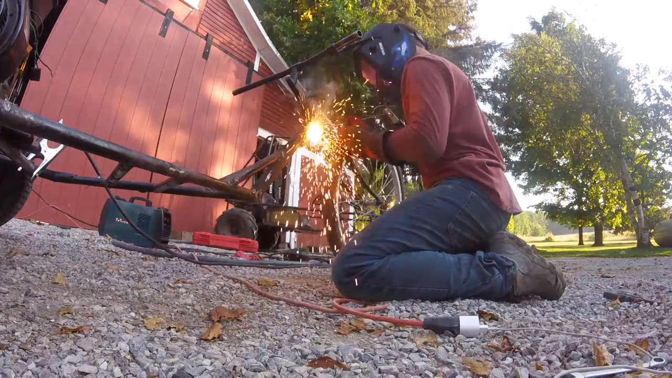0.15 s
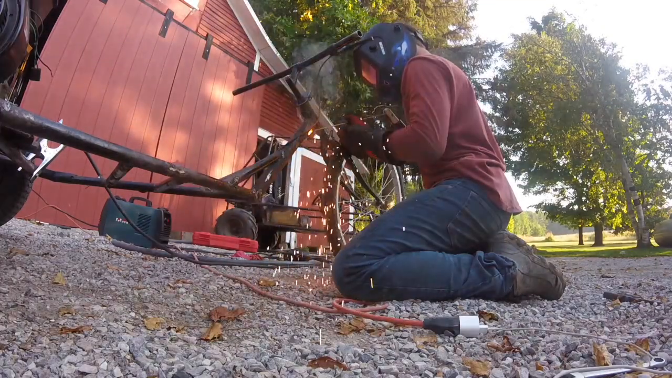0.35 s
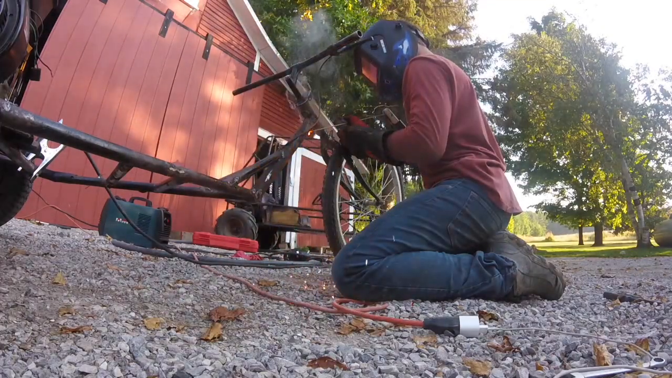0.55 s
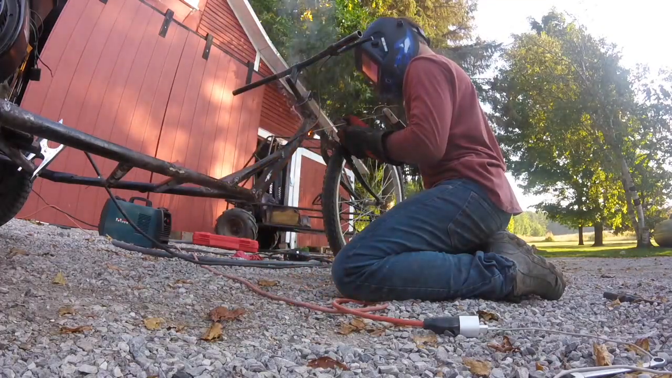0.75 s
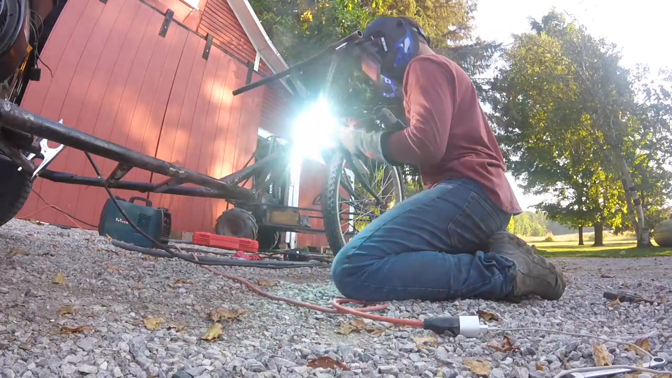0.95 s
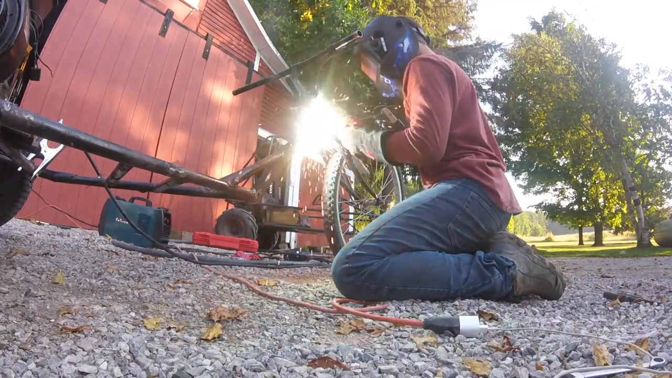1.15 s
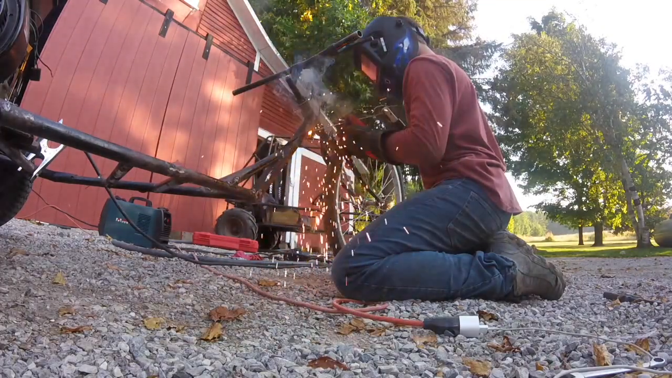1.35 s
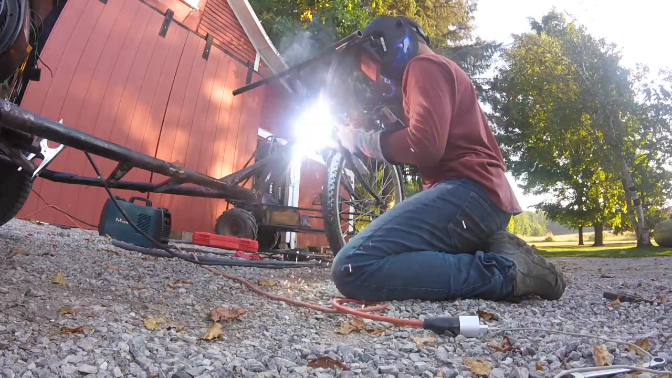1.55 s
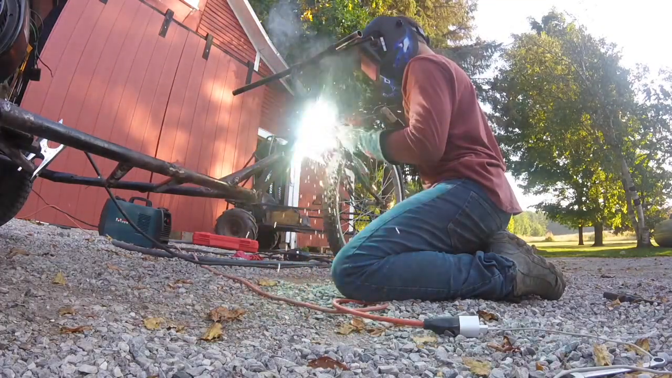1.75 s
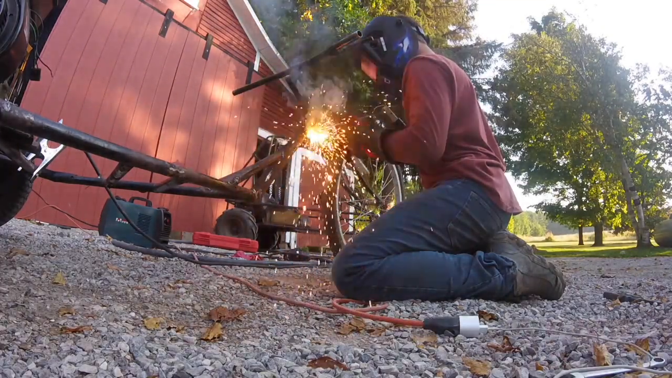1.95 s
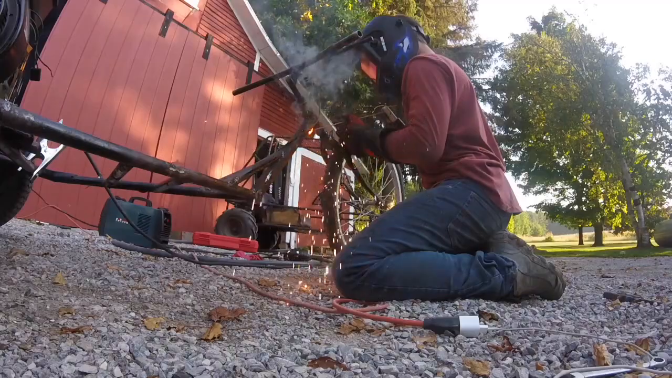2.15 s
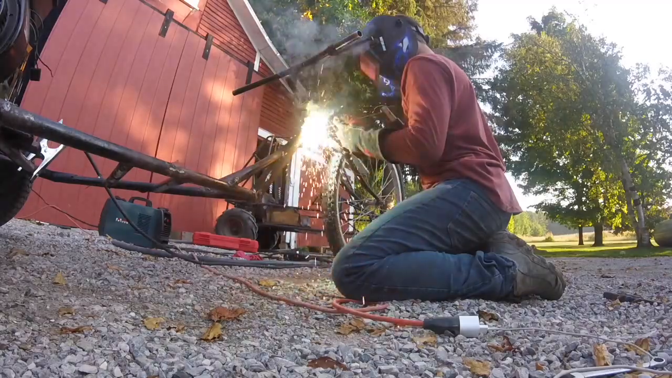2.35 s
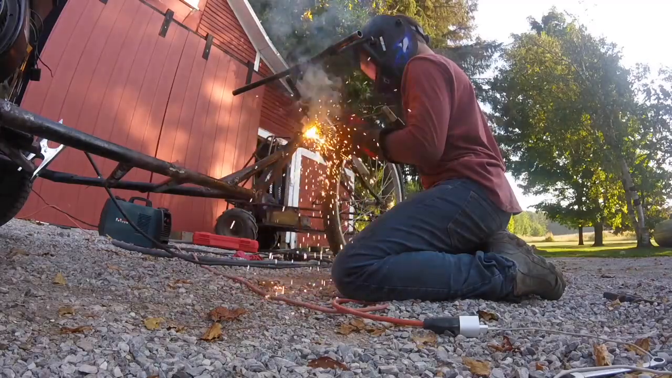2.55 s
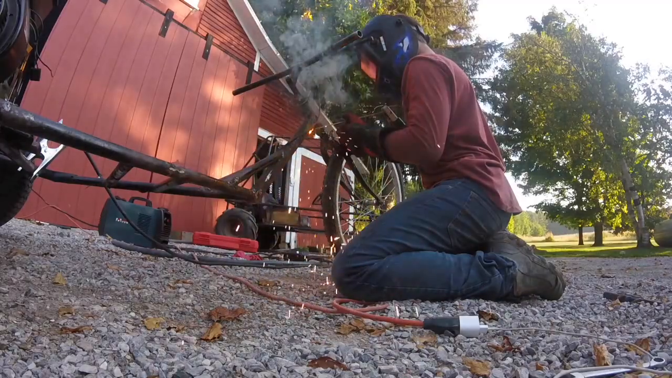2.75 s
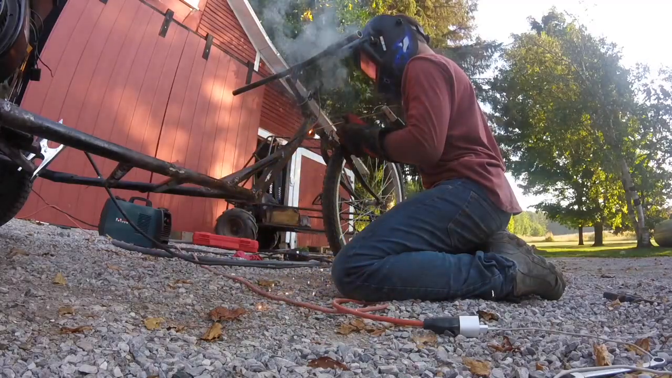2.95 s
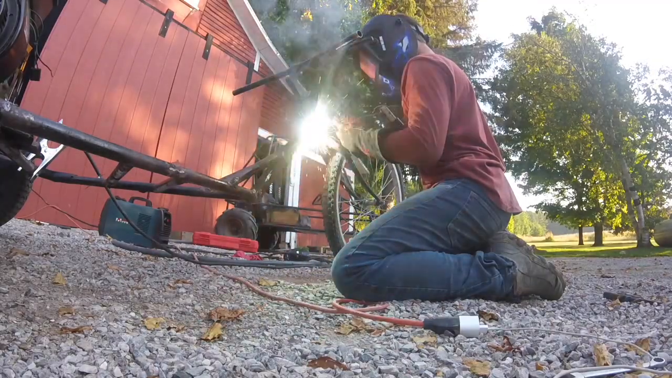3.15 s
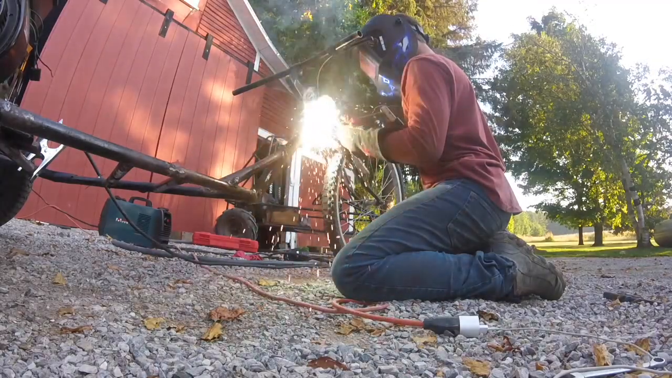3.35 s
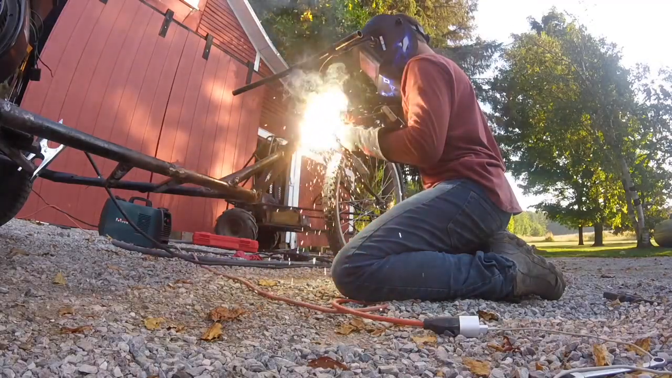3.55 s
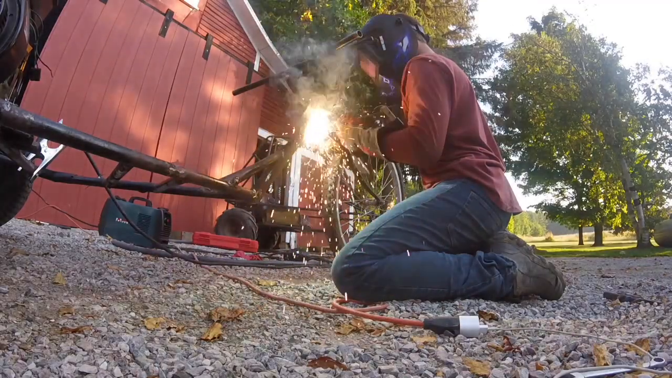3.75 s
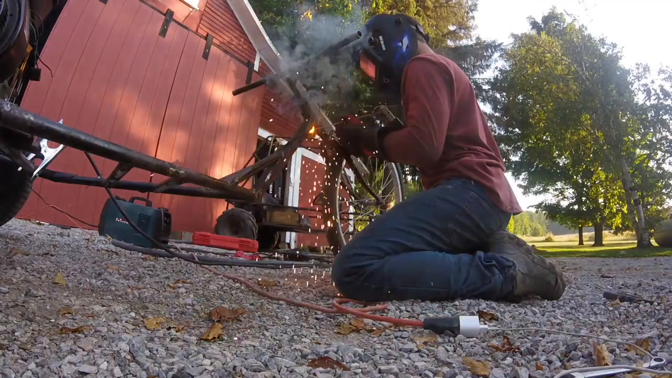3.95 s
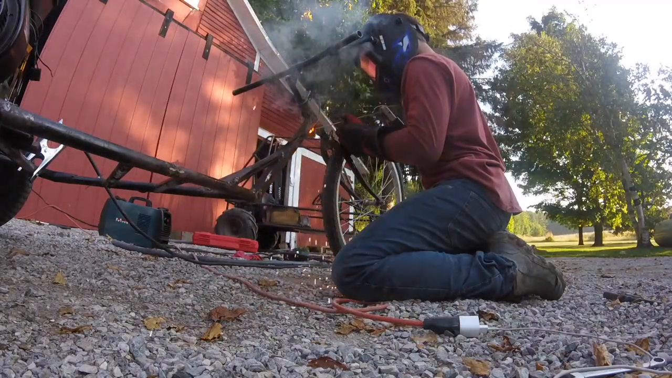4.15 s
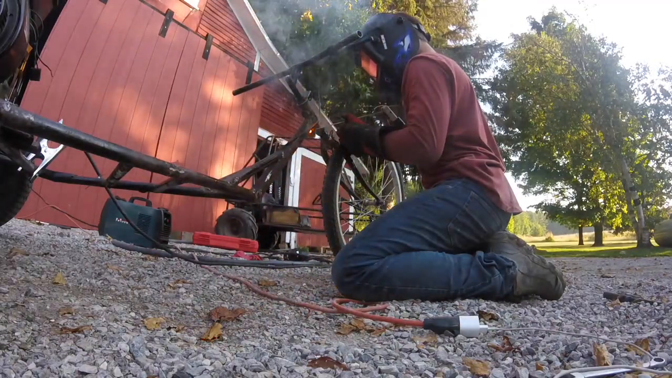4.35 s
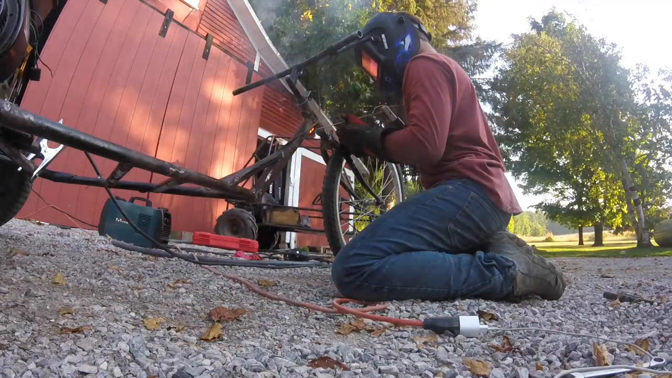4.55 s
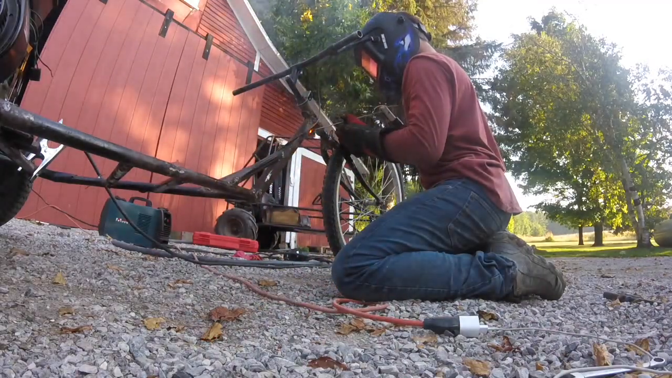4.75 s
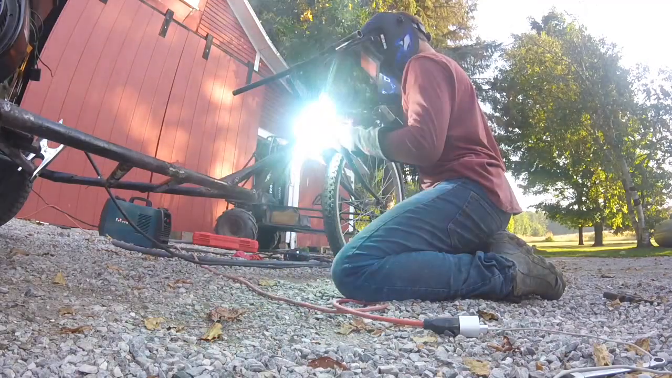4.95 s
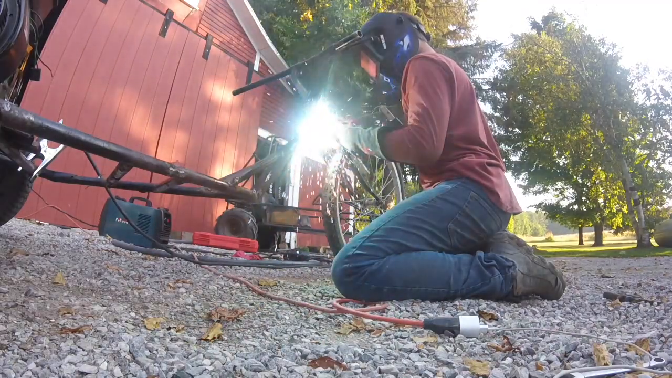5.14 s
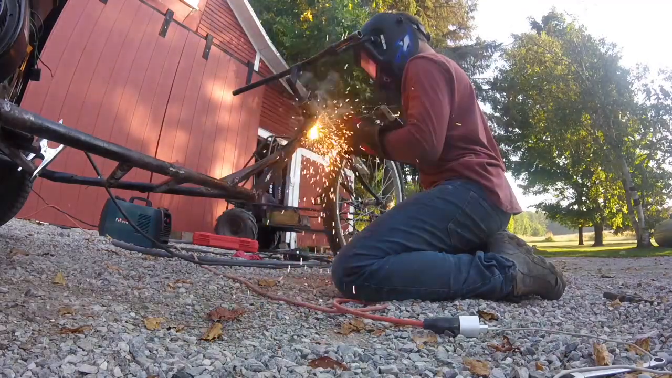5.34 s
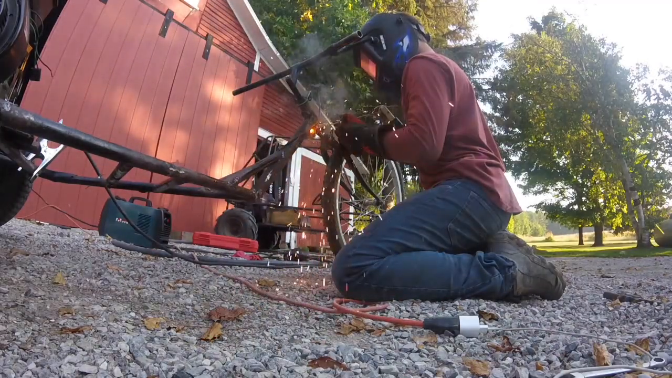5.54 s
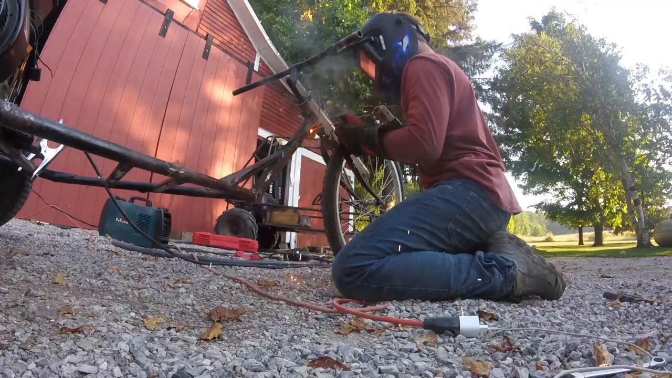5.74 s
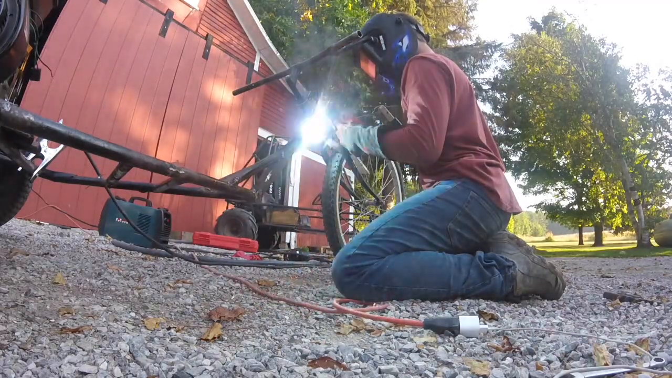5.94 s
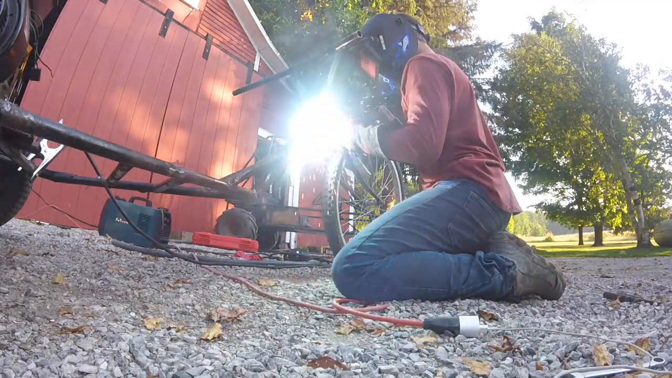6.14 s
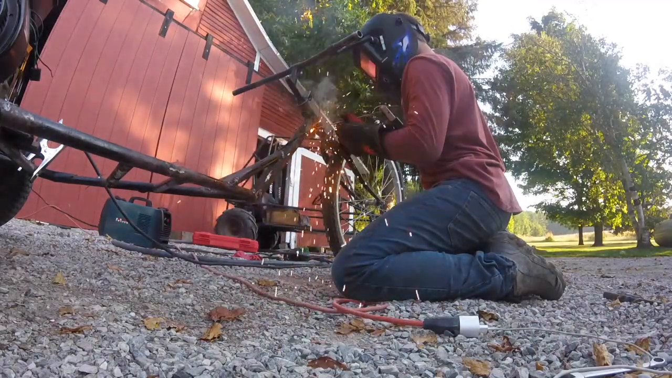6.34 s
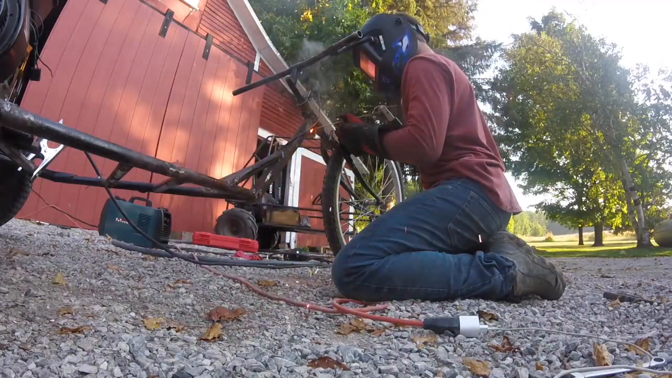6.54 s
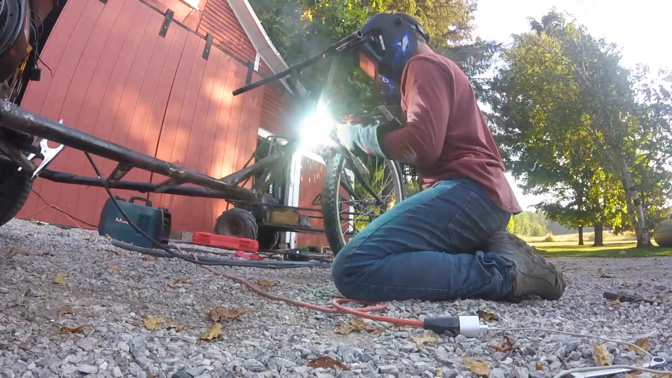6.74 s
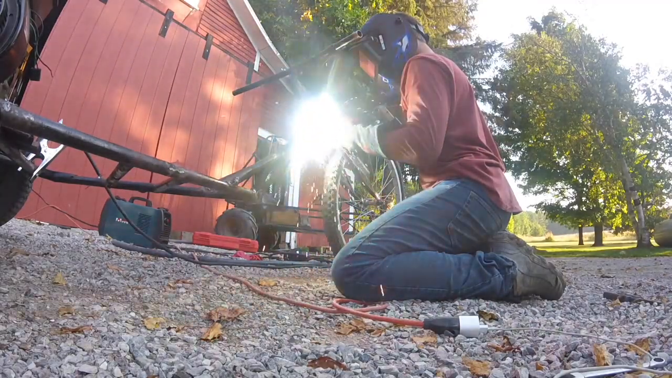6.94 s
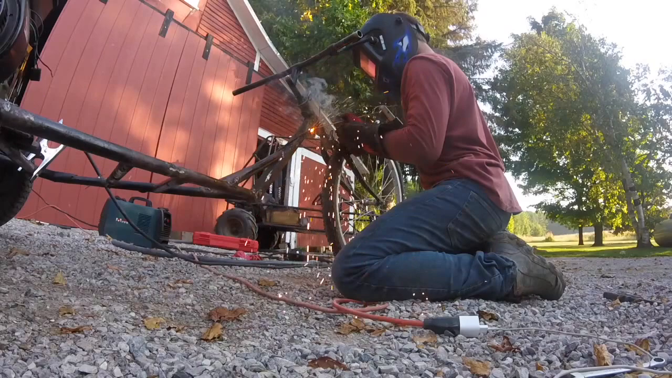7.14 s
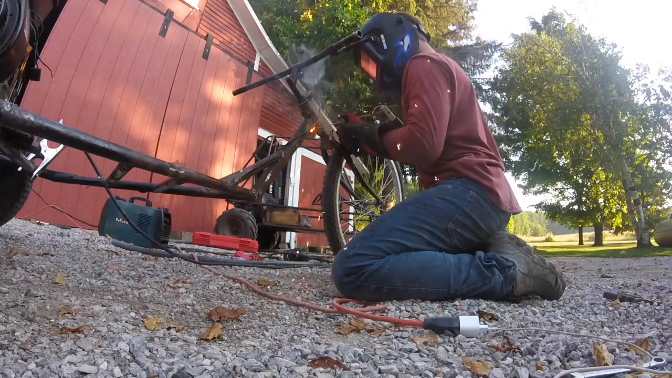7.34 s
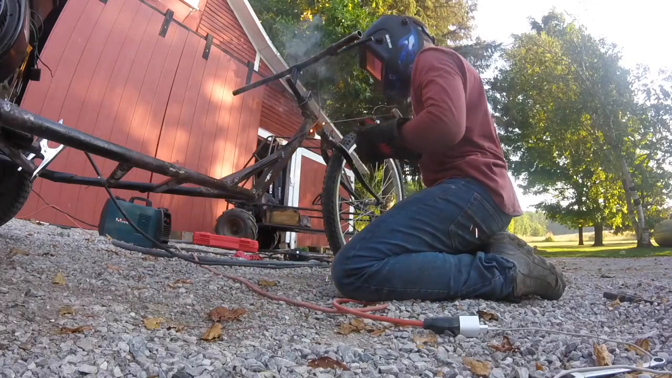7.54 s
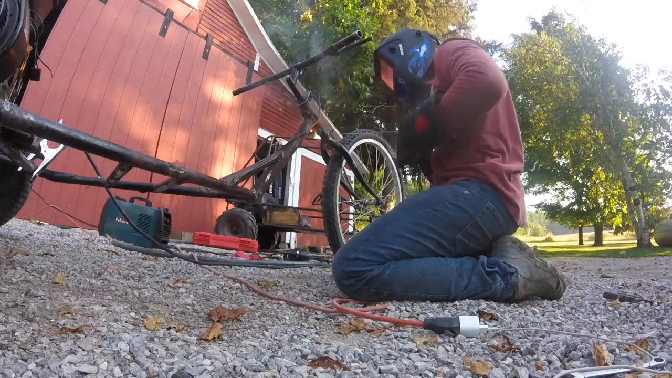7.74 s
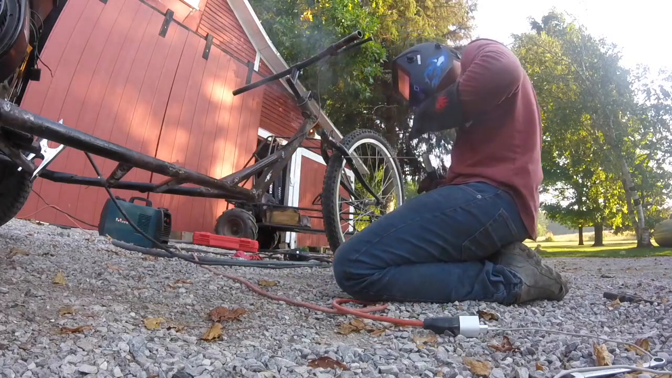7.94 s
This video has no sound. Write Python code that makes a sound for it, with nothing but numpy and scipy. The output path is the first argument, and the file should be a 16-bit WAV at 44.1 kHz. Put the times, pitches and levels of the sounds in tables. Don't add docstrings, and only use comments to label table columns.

```python
import sys
import numpy as np
from scipy import signal
from scipy.fft import rfft, irfft
from scipy.io import wavfile
from scipy.ndimage import uniform_filter1d

SR = 44100
rng = np.random.default_rng(int(sys.argv[2]) if len(sys.argv) > 2 else 0)


def dump(signal):
    limited = np.clip(np.atleast_2d(signal).T, -1, 1)
    pcm = np.round(limited * 32767).astype(np.int16)
    wavfile.write(sys.argv[1], SR, pcm)


def how_loud(loudness_db):
    steps = np.asarray(loudness_db, float) / 20
    return 10 ** steps


N = 352359
GRID_HZ = np.arange(4097) * SR / 8192 + 1


def impulse(power):
    ceps = irfft(np.log(power) / 2)
    half = len(ceps) // 2
    ceps[1:half] *= 2
    ceps[half + 1:] = 0
    return irfft(np.exp(rfft(ceps)))[:2048]


def shaped(points):
    hz, db = np.transpose(points)
    return impulse(how_loud(2 * np.interp(np.log(GRID_HZ), np.log(hz), db)))


def resonant(modes, valley_db, notches=()):
    power = how_loud(2 * valley_db)
    for hz, width, db in modes:
        power = power + how_loud(2 * db) / (1 + ((GRID_HZ - hz) / width) ** 2) ** 2
    for hz, width, db in notches:
        power = power * how_loud(2 * db / (1 + ((GRID_HZ - hz) / width) ** 2))
    return impulse(power)


def through(x, response):
    return signal.fftconvolve(x, response)[:N]


def peak_one(response):
    return response / abs(response).max()


def unit(x):
    return x / np.sqrt(np.mean(x ** 2))


def noise():
    return rng.standard_normal(N)


def walk(rate):
    hold = int(SR / rate)
    levels = np.repeat(rng.standard_normal(N // hold + 1), hold)
    return 1.123 * uniform_filter1d(levels, hold)[:N]


def grains(rate, spread_db):
    where, size, sign = rng.random(N), rng.exponential(size=N), rng.standard_normal(N)
    return (where < rate / SR) * sign * how_loud(spread_db * size)


# strike t/s, break t/s, tube ring level/dB, hum level/dB, frame ring level/dB
STITCH_TIMES = [
    (-0.1, 0.242, 1.5, 3, -3.5),
    (0.993, 1.296, 7, 1.5, 2),
    (1.647, 2.03, -11, 2, 0),
    (2.296, 2.622, -11, -8, 0),
    (3.184, 3.904, -12, 3, -1),
    (5.001, 5.403, 7, 1, -1),
    (6.038, 6.281, 13, 4.5, -0.5),
    (6.767, 7.057, 13, -7.5, -1),
]
# t/s, current as sputter level/dB, arc length as sizzle level/dB
ARC_CURVES = [
    [(0.0, -30.5, -40.5), (0.044, -40.5, -42.5), (0.182, -41, -40.5), (0.224, -40.5, -44.5),
     (0.24, -34, -40)],
    [(1.03, -45, -41), (1.112, -47, -43), (1.252, -45.5, -38.5), (1.276, -44, -42), (1.29, -45, -39.5)],
    [(1.68, -43.5, -43.5), (1.694, -46.5, -42.5), (1.848, -46, -41.5), (1.87, -44.5, -38),
     (2.025, -38, -41.5)],
    [(2.32, -51.5, -40.5), (2.372, -38, -42), (2.494, -44.5, -40), (2.558, -38.5, -41), (2.62, -39, -42.5)],
    [(3.21, -49.5, -43), (3.322, -48.5, -41.5), (3.47, -37, -42.5), (3.756, -36, -42.5), (3.9, -39.5, -43)],
    [(5.03, -58, -41), (5.078, -40.5, -45.5), (5.346, -37, -43), (5.358, -34.5, -45.5), (5.4, -39, -43.5)],
    [(6.06, -41.5, -45), (6.144, -38, -46.5), (6.156, -40, -43), (6.264, -37, -44.5), (6.28, -38, -42)],
    [(6.79, -39.5, -45.5), (6.81, -42.5, -47), (6.896, -38.5, -45), (6.914, -38.5, -45),
     (7.05, -35.5, -44.5)],
]


def arc_control(law, column=None):
    usual_db, flare_s, break_s = -42, 0.032, 0.0018
    level_db, by_current, by_length, flare_db = law
    t, gain = np.arange(N) / SR, np.zeros(N)
    for stitch, state in zip(STITCH_TIMES, ARC_CURVES):
        strike, stop = stitch[:2]
        s, current, length = np.transpose(state)
        drive_db = by_current * (current - usual_db) + by_length * (length - usual_db)
        db = level_db + np.interp(t, s, drive_db)
        db += flare_db * np.exp(-abs(t - strike) / flare_s)
        if column:
            db += stitch[column]
        gain += how_loud(db) * (t >= strike) * np.exp(-np.maximum(t - stop, 0) / break_s)
    return uniform_filter1d(gain, size=60)


# f/Hz, width/Hz, level/dB
BRIGHT_MODES = [(1814, 49, -16), (2340, 83, -3), (3050, 590, -1), (3865, 184, 2.5), (5360, 1130, -3),
                (7430, 570, 0), (9000, 500, -8), (10800, 620, -14), (10100, 260, -13), (12840, 320, -10.5),
                (15100, 1000, -25)]
# f/Hz, width/Hz, level/dB
ECHO_NOTCHES = [(1880, 100, -7), (2580, 67, -9.5), (4490, 84, -6), (6110, 180, -8.5), (9300, 190, -41)]
# f/Hz, level/dB per Hz
CASE_COLOUR = [(40, -40.5), (70, -19), (120, -7), (240, -4), (330, -7), (660, -5), (850, 2.5), (1030, -4),
               (1200, -9), (1330, -32.5), (1700, -30.5), (2200, -68.5), (3700, -46.5)]
# f/Hz, width/Hz, level/dB
FRAME_MODES = [(1683, 65, -7), (2243, 93, 4), (2880, 240, 2.5)]
# level/dB, share of current, share of arc length, strike flare/dB
SIZZLE_LAW = (-40.5, 0.27, 1.45, 1)
SPUTTER_LAW = (-40, 1.13, 0.6, 7.5)
TUBE_LAW = (-42.5, 0.14, 1.5, -4)
FRAME_LAW = (-45, 1.56, 0.1, 4)
HUM_LAW = (-43.5, 1.5, 1.1, 12)


def arc(bright, case):
    ripple_hz = 119.8
    phase = ripple_hz * np.arange(N) / SR + 0.31
    swell = np.exp(np.cos(2 * np.pi * (phase + 0.055 * walk(60))))
    sparks = unit(grains(20000, 2.5)) * swell ** 0.17 * how_loud(1.66 * walk(90) + 0.25 * walk(25))
    kicks = unit(grains(5000, 2.0)) * swell ** 0.3 * how_loud(1.35 * walk(ripple_hz))

    sizzle = unit(through(sparks, bright)) * arc_control(SIZZLE_LAW) * how_loud(-1.0)
    sputter = unit(through(kicks, case)) * arc_control(SPUTTER_LAW) * how_loud(4.0)
    tube_air = resonant([(803, 38, 0)], valley_db=-39.5)
    tube = unit(through(kicks, tube_air)) * arc_control(TUBE_LAW, column=2) * how_loud(-2.5)
    steel = resonant(FRAME_MODES, valley_db=-76.0)
    frame = unit(through(kicks + sparks, steel)) * arc_control(FRAME_LAW, column=4) * how_loud(-6.5)
    second = 1.18 * how_loud(2.1 * walk(12.16)) * np.cos(4 * np.pi * phase + 1.38)
    hum = (np.cos(2 * np.pi * phase) + second) * arc_control(HUM_LAW, column=3) * how_loud(-9.5)
    return sizzle + sputter + tube + frame + hum


# f/Hz, level/dB per Hz
FAN_AIR = [(12, -57), (20, -2.5), (65, -6), (146, -16.5), (186, -10), (246, -12.5), (285, -2), (344, -11.5),
           (363, -9), (406, -7.5), (438, -6), (471, -13.5), (557, -5.5), (887, -5.5), (1700, -35.5),
           (2210, -52), (3740, -120)]
# f/Hz, level/dB
BLADE_TONES = [(290.7, -61), (436.0, -56.5), (667.5, -59.5), (877.5, -56.5)]
# f/Hz, width/Hz, level/dB
HOUSING_MODES = [(1052, 106, 2), (1299, 24, -3.5)]


def fan():
    fan_db = -44.5
    air = unit(through(noise(), shaped(FAN_AIR))) * how_loud(fan_db + 0.5 * walk(3))
    draught = unit(through(noise(), resonant(HOUSING_MODES, valley_db=-80))) * how_loud(fan_db - 10)
    sway = np.cumsum(1 + 0.0015 * walk(5)) / SR
    out = air + draught
    for hz, db in BLADE_TONES:
        out += how_loud(db + 4.0 + 1.0 * walk(14)) * np.sin(2 * np.pi * hz * sway)
    return out


# f/Hz, level/dB per Hz
LEAF_HISS = [(880, -30.5), (1500, -5), (2420, -10.5), (6570, -16.5), (8690, -21), (10300, -29),
             (12600, -31), (13800, -52)]


def trees():
    return unit(through(noise(), shaped(LEAF_HISS))) * how_loud(-66 + 0.8 * walk(1.5))


# t/s, click rate f/Hz, level/dB
CICADA_SONG = [(0, 201.4, -84), (1.5, 201, -78), (2.15, 200.5, -73.5), (2.7, 200.3, -64.5),
               (3.15, 200.2, -75.5), (4, 199.4, -80), (4.5, 199.2, -75), (4.95, 199.2, -70.5),
               (5.5, 198.6, -70), (6, 198, -74), (6.699, 196, -75.5), (7.3, 194.2, -69.5), (7.6, 193, -76),
               (7.99, 190, -81)]
# f/Hz, width/Hz, level/dB
CICADA_BODY = [(5790, 95, 0), (6400, 120, -16), (6800, 150, -24), (7480, 150, -15), (8750, 120, -19)]
# t/s, click rate f/Hz, level/dB
NEIGHBOUR_SONG = [
    (0, 206, -80),
    (.7, 205, -90),
    (1.5, 204, -85),
    (5.5, 200, -92),
    (6.5, 198, -75),
    (7.15, 193.3, -64),
    (7.5, 192, -71),
    (7.99, 185, -72),
]
# f/Hz, width/Hz, level/dB
NEIGHBOUR_BODY = [(5800, 330, 0), (6700, 350, -7), (7450, 250, -8), (8650, 250, -13)]


def cicada(song, body, waver):
    s, rate, level_db = np.transpose(song)
    t = np.arange(N) / SR
    clicks = np.cumsum(np.interp(t, s, rate) * (1 + waver * walk(4.8))) / SR
    tones = np.zeros(N)
    for harmonic in range(26, 46):
        tones += how_loud(1.5 * walk(3)) * np.sin(2 * np.pi * (harmonic * clicks + rng.random()))
    return unit(through(tones, resonant(body, valley_db=-40))) * how_loud(np.interp(t, s, level_db))


# t/s, peak level/dB, f/Hz, ring/s
PLASMA_POPS = [(0.235, -20, 930, 0.016), (0.996, -20, 814, 0.033), (1.006, -10.5, 834, 0.017),
               (3.455, -25, 850, 0.014), (3.503, -21, 840, 0.015), (3.564, -22, 900, 0.0099),
               (3.696, -16, 860, 0.014), (3.747, -21, 840, 0.015), (3.789, -14, 840, 0.018),
               (3.821, -24, 850, 0.017), (3.881, -23, 965, 0.036), (6.039, -17, 774, 0.018),
               (6.165, -23, 810, 0.023), (6.2, -18.5, 800, 0.036), (6.26, -18, 820, 0.028),
               (6.938, -21, 790, 0.04), (7.025, -16.5, 810, 0.02)]


def pops():
    out, t = np.zeros(N + 4096), np.arange(4096) / SR
    for s, db, hz, ring in PLASMA_POPS:
        shape = (1 - np.exp(-t / 0.0021)) * np.exp(-np.log(1000) * t / max(ring, 0.005))
        i = int(s * SR)
        out[i:i + 4096] += how_loud(db - 4.5) * shape / shape.max() * np.sin(2 * np.pi * hz * t)
    return out[:N]


# t/s, peak level/dB, low part over it level/dB, ring/s
ARC_SNAPS = [(0.9935, -15, 0, 0.014), (1.2063, -28, 6, 0.01), (1.229, -24, 1, 0.011),
             (1.2911, -28.5, 10.5, 0.015), (1.648, -15.5, -8, 0.016), (2.297, -16.5, -3, 0.012),
             (2.616, -22.5, 3.5, 0.0068), (3.1835, -11, -4, 0.0049), (3.256, -20, -5, 0.015),
             (3.4218, -20, -16, 0.0096), (3.5973, -26, -8, 0.012), (3.6863, -23, -15, 0.022),
             (3.7981, -22, -4, 0.0074), (3.8801, -22.5, 7.5, 0.014), (5.001, -14, 3.5, 0.0041),
             (5.1291, -31.5, 19.5, 0.008), (5.1739, -28, 4, 0.018), (5.255, -22, 3, 0.012),
             (5.301, -18, 3.5, 0.0074), (5.317, -29.5, 9, 0.058), (5.3375, -20.5, -21, 0.017),
             (5.3799, -21.5, 6, 0.021), (6.0386, -26, 5.5, 0.018), (6.768, -14.5, -8, 0.0056),
             (6.844, -37, 15, 0.012), (6.939, -28.5, 9.5, 0.022), (7.0235, -23, 9, 0.0098)]
# f/Hz, level/dB per Hz
BARE_SNAP = [(500, 0), (1000, -6), (1500, -40), (2200, -0.5), (4000, 2), (6200, -8), (7500, -3.5),
             (9000, -14), (12500, -41), (15500, -54)]


def snaps(bright, case):
    high, low, t = np.zeros(N + 4096), np.zeros(N + 4096), np.arange(4096) / SR
    for s, db, low_db, ring in ARC_SNAPS:
        i = int((s + 0.0005) * SR)
        shock = 0.21 * rng.standard_normal(4096) * np.exp(-np.log(1000) * t / max(ring, 0.002))
        shock[0] = -1
        high[i:i + 4096] += how_loud(db) * shock
        low[i:i + 4096] += how_loud(db + low_db) * shock
    crack = through(high, peak_one(shaped(BARE_SNAP))) + through(high, peak_one(bright))
    kick = through(low, peak_one(case))
    return how_loud(-9.5) * crack + how_loud(-6.5) * kick


# t/s, peak level/dB
SPATTER_TICKS = [
    (1.3804, -46),
    (1.4102, -46),
    (1.4755, -46),
    (1.5189, -44),
    (1.5628, -49),
    (2.6794, -47),
    (5.5114, -50),
    (5.5573, -48),
    (7.234, -50),
]


def spatter():
    out, t = np.zeros(N + 512), np.arange(512) / SR
    for s, db in SPATTER_TICKS:
        i = int(s * SR)
        out[i:i + 512] += how_loud(db - 21) * rng.standard_normal(512) * np.exp(-t / 0.003)
    stone = resonant([(3700, 900, 0), (7400, 900, -14)], valley_db=-45)
    return through(out, peak_one(stone))


def yard(x):
    t60_s, tail_db, dull_hz = 0.15, -15, 5000
    t = np.arange(SR // 4) / SR
    tail = rng.standard_normal(len(t)) * np.exp(-np.log(1000) * t / t60_s) * (t > 0.004)
    tail = signal.lfilter(*signal.butter(1, dull_hz, fs=SR), tail)
    return x + how_loud(tail_db) * through(x, tail / np.linalg.norm(tail))


def scene():
    bright = resonant(BRIGHT_MODES, valley_db=-44, notches=ECHO_NOTCHES)
    case = shaped(CASE_COLOUR)
    weld = arc(bright, case) + pops() + snaps(bright, case)
    cicadas = cicada(CICADA_SONG, CICADA_BODY, waver=0.00049)
    cicadas += cicada(NEIGHBOUR_SONG, NEIGHBOUR_BODY, waver=0.0091)
    return (yard(weld) + fan() + trees() + cicadas + spatter())[None]


def roll_off(x):
    return signal.sosfilt(signal.butter(12, 15800, fs=SR, output="sos"), x)


def record(dry):
    top_cut = signal.ellip(8, 0.2, 70, 15300, fs=SR, output="sos")
    mix = signal.sosfilt(top_cut, dry)
    return roll_off(mix)


dry = scene()
out = record(dry)
dump(out)
```